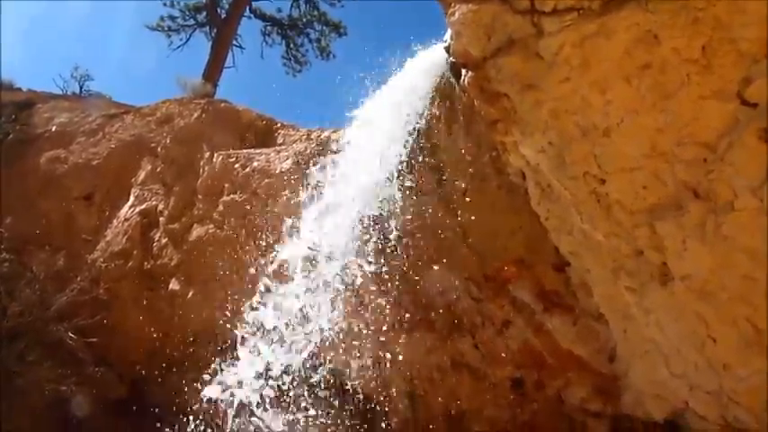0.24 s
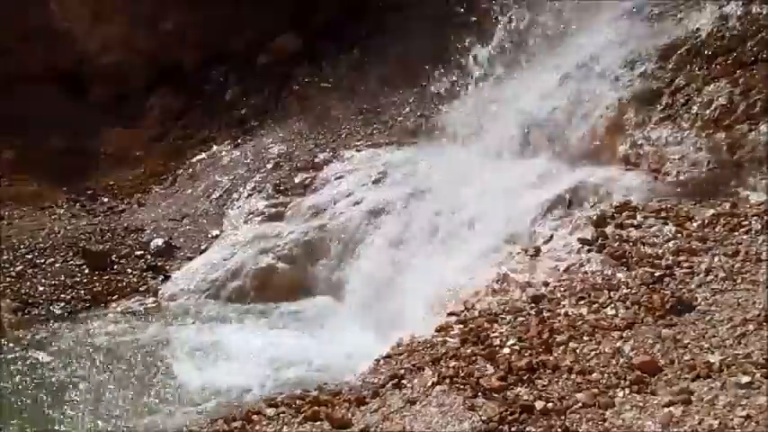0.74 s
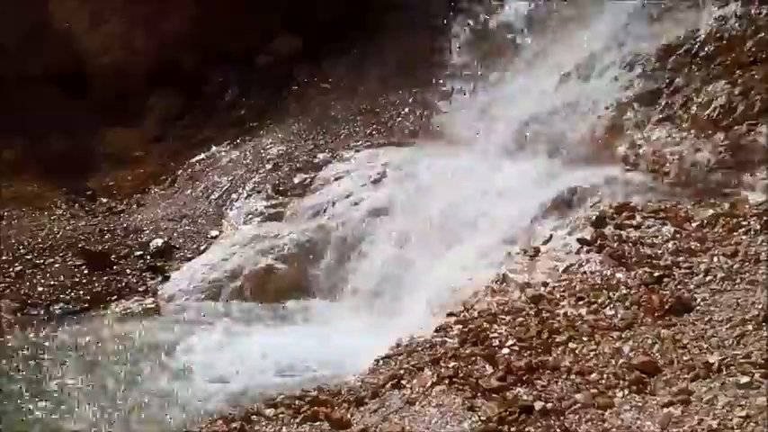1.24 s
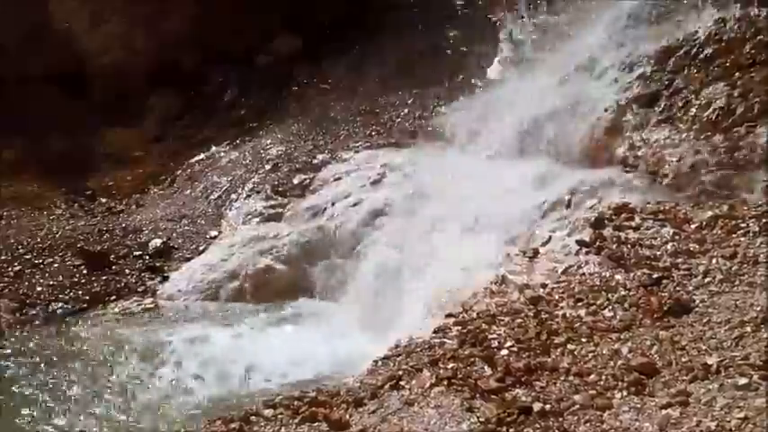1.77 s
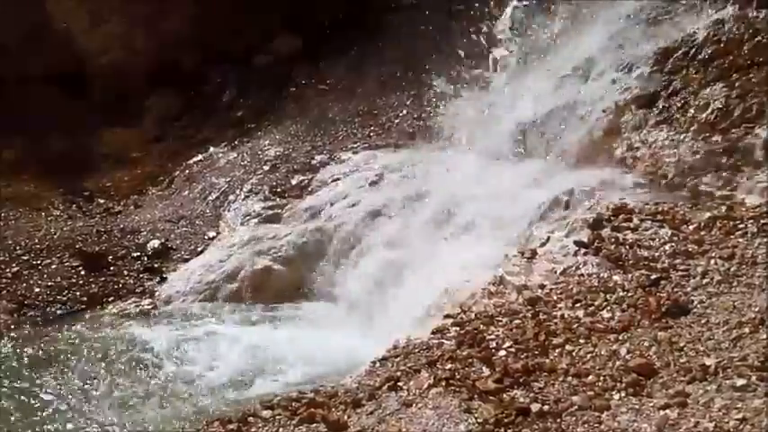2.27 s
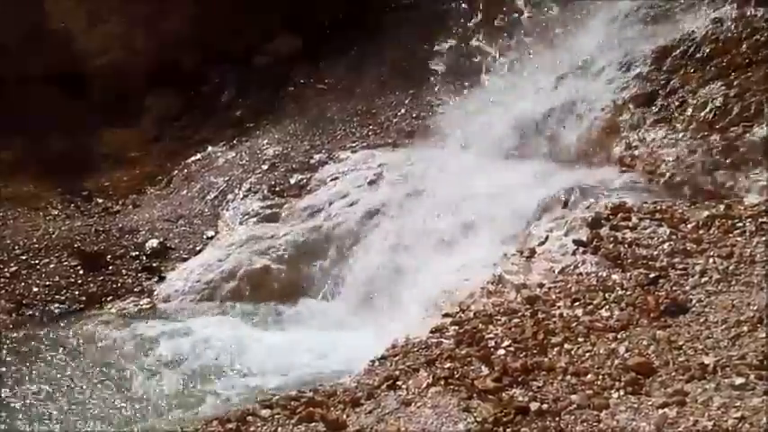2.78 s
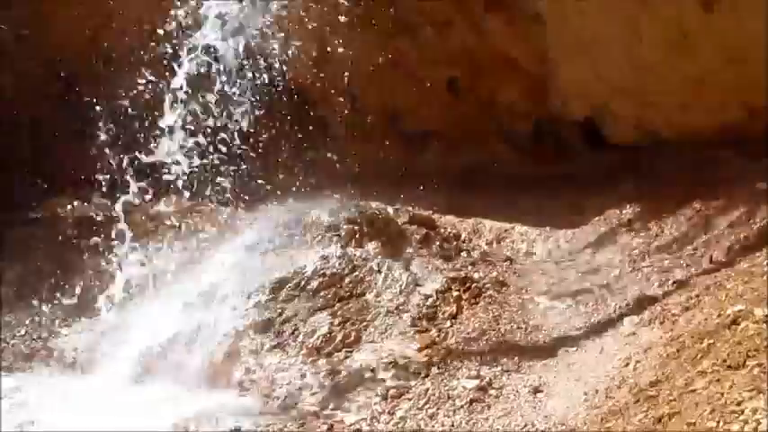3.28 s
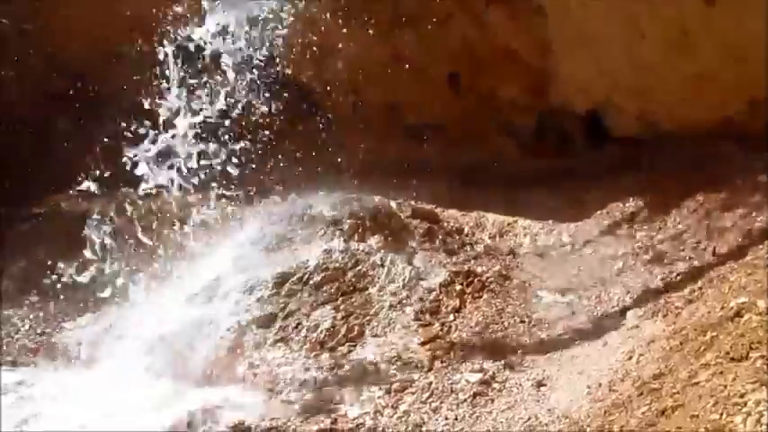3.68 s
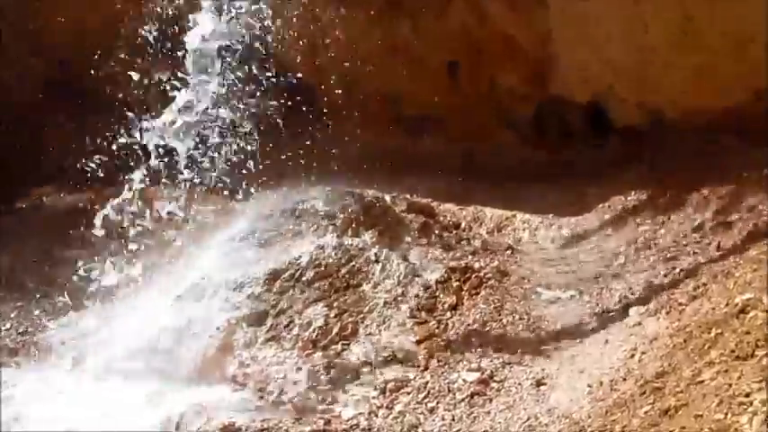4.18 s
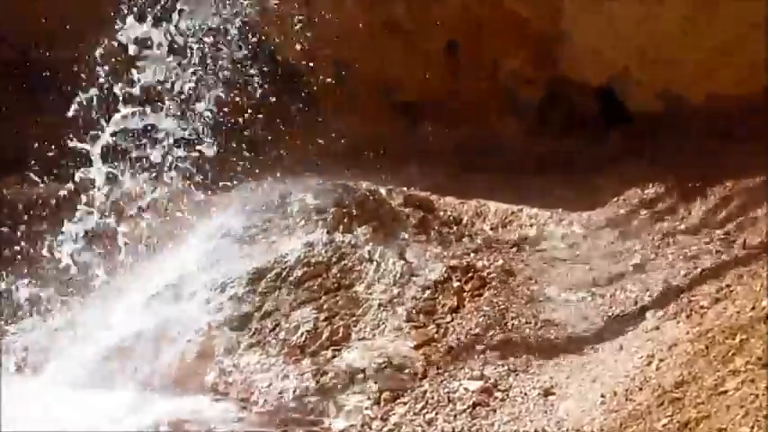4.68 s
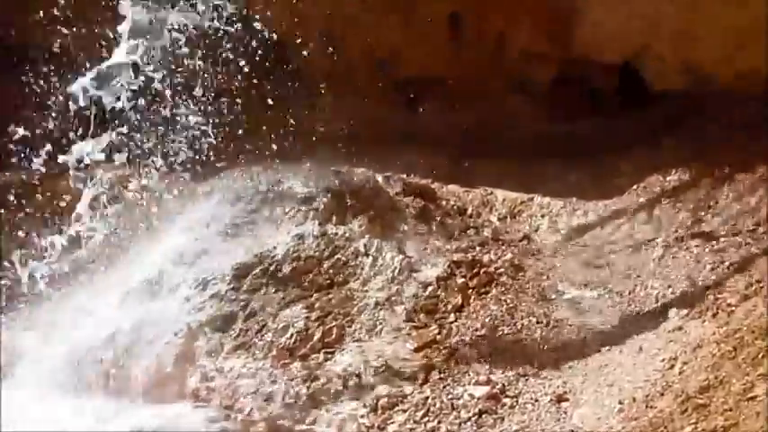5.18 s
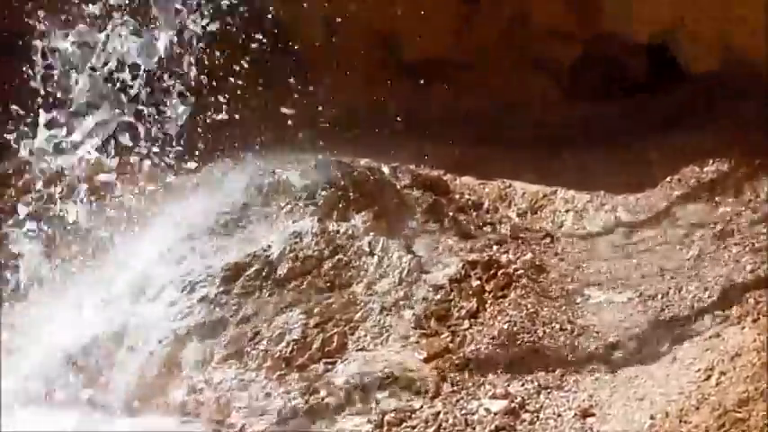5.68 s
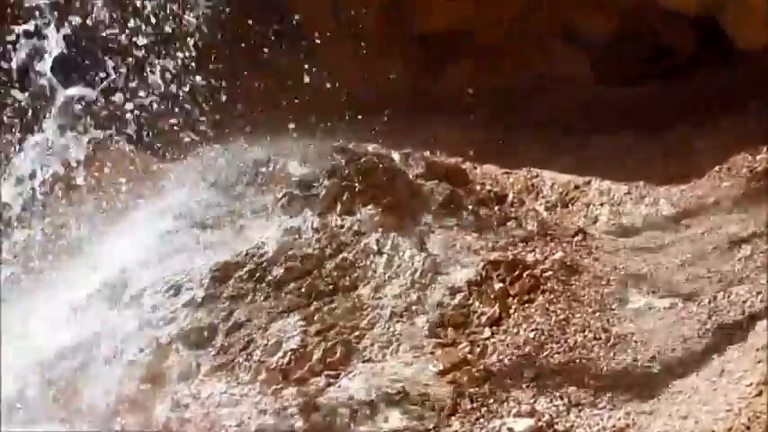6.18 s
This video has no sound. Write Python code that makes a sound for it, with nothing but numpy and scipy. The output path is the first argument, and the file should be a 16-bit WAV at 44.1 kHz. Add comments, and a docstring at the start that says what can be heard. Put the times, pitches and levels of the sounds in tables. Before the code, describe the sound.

A small waterfall is already roaring at full strength, cuts to a short silence, returns from a second spot as a bright, gushing cascade over gravel with low wind buffets mostly on the left, cuts again briefly, then continues without wind, more splattery, with wet slaps and drop ticks. Outdoors, close stereo microphone, dry, no echo.

```python
"""A waterfall roars from the first instant, dropping onto a rock mound and running off over gravel.
It is heard from three spots in turn, parted by short silences. The fall is a dense train of random impacts
plus ringing air bubbles, filtered and flickering band by band. Wind buffets the two microphone ports as
low-passed noise at the first two spots; drops tick on stone as damped clicks; lumps of water slap as
decaying sines."""
import sys
import numpy as np
from scipy import signal
from scipy.fft import rfft, irfft, next_fast_len
from scipy.io import wavfile

SR = 44100
rng = np.random.default_rng(int(sys.argv[2]) if len(sys.argv) > 2 else 0)


def transcribe(u):
    """Save the signal u as a 16-bit wav file named by the first command-line argument.

    u: samples, shape (n,) or (channels, n), limited to [-1, 1]; the rate is SR.
    q: integer samples, one column per channel.
    """
    v = np.clip(np.atleast_2d(u).T, -1, 1)
    q = np.round(v * 32767).astype(np.int16)
    wavfile.write(sys.argv[1], SR, q)


N = 283563

# Listening spots. Each row: start in seconds, end in seconds, lag of the left port in microseconds.
SPOTS = [(-.01, .4700, -42), (.6463, 3.0845, 38), (3.2497, 6.45, -38)]
# Strength of the flow, one list per spot. Each row: time in seconds, level in dB.
FLOW = [
    [(0, -20.5), (.13, -19.5), (.47, -19.5)],
    [(.65, -18), (.75, -19.5), (.94, -19), (1.04, -20.5), (1.27, -21.5), (1.5, -19.5), (2.0, -20.5),
     (2.17, -20.5), (2.8, -20.5), (2.86, -22.5), (2.93, -20.5), (3.08, -22)],
    [(3.25, -19.5), (3.5, -19.5), (3.95, -20), (4.09, -22), (4.38, -21), (4.5, -20), (4.77, -20),
     (5.39, -21), (5.58, -19.6), (5.75, -21.5), (5.9, -21), (6.43, -20.3)],
]
# Relative spectrum of the fall, microphone included, one list per spot. Each row: frequency in Hz, dB per Hz.
COLOUR = [
    [(40, -21), (184, -10.5), (303, -12), (371, -10), (710, -5), (1030, -6.5), (1500, -2.5), (2540, -1),
     (4200, -3), (6500, -6.5), (9500, -10.5), (13000, -20), (15800, -24)],
    [(40, -31), (230, -13.5), (340, -19.5), (560, -11), (800, -10.5), (1000, -8.5), (1800, -5), (2400, -4),
     (3700, -4.15), (4500, -7), (6500, -8), (9500, -11.5), (13000, -19), (15800, -27)],
    [(30, -39), (110, -21.5), (235, -12), (330, -17.5), (600, -9.5), (850, -11), (1350, -6.5), (1600, -7),
     (2300, -4), (3400, -6), (5600, -14), (7500, -9.5), (10000, -14), (15800, -25.5)],
]
# Share of power reaching both ports straight from the fall, one list per spot.
# Each row: frequency in Hz, left-right likeness from 0 to 1.
LIKENESS = [
    [(100, 0.76), (600, 0.98), (1700, 0.71), (3200, 0.77), (6500, .15), (9500, 0.41), (15000, .08)],
    [(100, 0.76), (700, 0.94), (1700, 0.7), (3700, 0.41), (6500, 0.31), (10500, 0.19), (15000, 0.21)],
    [(100, 0.99), (700, 0.9), (1700, 0.78), (3200, 0.37), (5500, 0.18), (10000, 0.31), (15000, 0.091)],
]
# Balance of the ports, one list per spot. Each row: frequency in Hz, left minus right in dB.
SIDEDNESS = [
    [(300, -0.5), (700, 1.5), (1700, -0.5), (3200, -3.5), (7000, 1.3), (8500, -0.5), (12000, .5)],
    [(300, -1), (700, -0.2), (1700, -1.1), (3700, -3.5), (6000, -1.2), (10000, -2.5), (14000, -1)],
    [(300, 0), (800, 0.7), (2500, -1.7), (3700, 0.5), (8500, -0.7), (14000, 0)],
]
# Random swell of the whole fall
SURGE_DB, SURGES_PER_S = .25, 6.0
# Share of the flow's swing in dB that the fine spray takes part in
SPRAY_FOLLOWS = 0.95
# Relative spectrum of the wind noise. Each row: frequency in Hz, dB per Hz.
GUST_COLOUR = [(15, -38.5), (25, -10), (87, 4), (204, 1), (509, -3), (647, -10.5), (900, -9), (1170, -45.5),
               (1980, -120)]
# Steady breeze on the ports. Each row: time in seconds, level in dB, left minus right in dB.
BREEZE = [(0, -51, 2), (.47, -40.5, 1), (.65, -57, 8), (1.1, -41, 6.5), (1.9, -48, 12), (2.4, -55.5, 10),
          (2.7, -54.5, 3), (3.08, -44, 0)]
# Gusts. Each row: time of the top in seconds, level in dB, length in seconds, left minus right in dB,
# brightness (upper minus lower part) in dB.
GUSTS = [(0.197, -31.5, 0.012, -2, 12), (0.425, -51.5, 0.053, -1, -4), (0.754, -32, 0.034, 21, 1.5),
         (0.854, -33.5, 0.068, 14, -2), (0.966, -45, 0.06, 14, -18), (1.381, -37, 0.068, 19, -10),
         (1.507, -37, .04, 8, -7), (1.562, -32.5, .05, 14, 4), (1.662, -35, 0.019, 16, 2.5),
         (1.855, -41.5, .05, 19, 10), (1.96, -38, 0.045, 13, 5), (2.044, -49, 0.026, 11, 1),
         (2.236, -40.5, 0.042, 16, -11), (2.32, -51, 0.12, 21, -18.5), (2.846, -37, .05, 2, -15),
         (3.006, -45.5, .08, 3, -4)]
GUST_FALL_TO_RISE = 1.18   # a gust dies this much slower than it rises
# Single drops on stone close by. Each row: time in seconds, peak in dB.
TICKS = [(0.8783, -11), (1.664, -6), (2.7845, -8), (3.5377, -9.5), (4.0075, -10), (4.1964, -8),
         (4.601, -16), (4.6426, -9), (5.220, -8)]
# Big lumps of water landing. Each row: time in seconds, peak in dB, pitch in Hz.
SLAPS = [(0.9901, -9, 2390), (1.2051, -16, 1800), (2.069, -7.5, 4090), (2.2017, -8.5, 2330),
         (2.3583, -9, 1970), (2.6089, -17, 3180), (2.905, -11, 2540), (3.0524, -10, 1960),
         (3.7497, -10.5, 1970), (3.899, -5, 2040), (4.0287, -13.5, 2050), (4.468, -8.5, 2800),
         (4.656, -9, 2500), (4.737, -6, 2500), (5.332, -6.5, 2820), (5.6254, -4.5, 2160),
         (5.8326, -7, 1740), (6.2227, -38, 1500), (6.361, -17, 1840)]
# Narrow dark lines at the first two spots. Each row: frequency in Hz, width in Hz, depth from 0 to 1.
NOTCHES = [(5915, 150, 0.8), (7840, 220, .96)]
TAIL_DROP_DB, TAIL_DB_PER_S = -16, 1509   # a faint tail dies after each stop
CUTOFF_HZ = 15820
CONTROL_STEP = 40   # samples between the points of a slow curve
HALF_EACH = np.array([[.5], [-.5]])   # splits a left-minus-right dB value between the ports


def amp(db):
    """Decibel law: 20 dB is a tenfold amplitude."""
    return 10 ** (np.asarray(db) / 20)


def rms_one(x):
    """Normalisation to unit root-mean-square amplitude."""
    return x / np.sqrt(np.mean(x ** 2) + 1e-20)


def in_time(tables):
    """Linear interpolation of joined curve tables, giving each column one value per sample."""
    seconds, *columns = np.transpose(np.concatenate(tables))
    t = np.arange(N) / SR
    return [np.interp(t, seconds, column) for column in columns]


def at_hz(points, hz):
    """Interpolation of a spectrum along a logarithmic frequency axis."""
    table_hz, values = np.array(points).T
    return np.interp(np.log(hz + 1), np.log(table_hz), values)


def drift(rate, size):
    """Low-passed noise: two equal poles at rate Hz leave a slow random curve of unit spread."""
    pole = np.exp(-2 * np.pi * rate * CONTROL_STEP / SR)
    noise = rng.standard_normal(size // CONTROL_STEP + 2002)
    slow = signal.lfilter([1], [1, -2 * pole, pole * pole], noise)[2000:]   # settled part only
    return np.interp(np.arange(size) / CONTROL_STEP, np.arange(len(slow)), rms_one(slow))


def drops(size, per_s, spread_db):
    """Shot noise: impacts fall at independent random moments, most small, a few large."""
    size_db = spread_db * np.minimum(rng.exponential(1, size), 5.0)
    impacts = amp(size_db) * rng.choice([-1, 1], size)
    lands = rng.random(size) < per_s / SR
    return rms_one(impacts * lands)


def bubbles(size, hz, per_s, cycles):
    """Bubble resonance: each trapped air pocket rings at one of many pitches, losing 60 dB in some cycles."""
    pitches_hz = np.geomspace(450, 6000, 30)
    born = drops(size, per_s, spread_db=2.0)
    dealt = rng.integers(0, len(pitches_hz), size)   # which pitch each bubble takes
    spectrum = 0
    for k, pitch_hz in enumerate(pitches_hz):
        width_hz = np.log(1000) * pitch_hz / cycles / np.pi
        resonance = 1 / (1 + 2j * (hz - pitch_hz) / width_hz)
        spectrum = spectrum + rfft(born * (dealt == k)) * resonance
    return spectrum * np.sqrt(len(pitches_hz))


def fall(spot, size, bright_db):
    """Partial coherence: both ports share straight drops and bubbles, and each adds its own scattered drops."""
    hz = np.fft.rfftfreq(size, 1 / SR)
    straight = rfft(drops(size, per_s=14000.0, spread_db=1.75))
    straight = straight + amp(-3.0) * bubbles(size, hz, per_s=1500.0, cycles=36.0)
    scattered = rfft([drops(size, per_s=14000.0, spread_db=3.0) for side in "LR"])

    alike = np.clip(at_hz(LIKENESS[spot], hz), 0, 1)
    late = np.exp(-2j * np.pi * hz * SPOTS[spot][2] / 1e6)   # delay as a phase slope
    lags = np.array([late, np.ones_like(late)])
    pair = np.sqrt(alike) * straight * lags + np.sqrt(1 - alike) * scattered
    pair = pair * amp(at_hz(COLOUR[spot], hz) + at_hz(SIDEDNESS[spot], hz) * HALF_EACH)

    band_place = np.clip(2 * np.log2((hz + 1) / 60), 0, 16)   # in half octaves above 60 Hz
    out = 0
    surge, neighbour = drift(40, size), drift(15, size)
    for band in range(17):
        share = np.clip(1 - abs(band_place - band), 0, 1)   # overlapping triangles
        own = drift(15, size)
        flicker_db = 0.35 * surge + 0.42 * (own + neighbour)   # adjoining bands flicker partly together
        spray_db = bright_db * np.clip(band - 11, 0, 2) / 2   # treble bands only
        out = out + irfft(pair * share, size) * amp(flicker_db + spray_db)
        neighbour = own
    return out / np.sqrt(np.mean(out.mean(axis=0) ** 2))


def wind():
    """Turbulent pressure: lumpy low noise, separate in each port; bright gusts hold more upper rumble."""
    t, hz = np.arange(N) / SR, np.fft.rfftfreq(N, 1 / SR)
    rumble = rfft(rng.standard_normal((2, N))) * amp(at_hz(GUST_COLOUR, hz))
    upper = 1 / (1 + (140 / (hz + 1)) ** 4)   # crossover at about 140 Hz
    scale = np.std(irfft(rumble, N))

    level_db, pan_db = in_time([BREEZE])
    low = high = amp(level_db + pan_db * HALF_EACH)
    for top_s, top_db, length, gust_pan_db, bright_db in GUSTS:
        stretch = np.where(t < top_s, 1, GUST_FALL_TO_RISE)
        swell = np.exp(-(2 * (t - top_s) / length / stretch) ** 2)
        low = low + swell * amp(top_db - bright_db / 2 + gust_pan_db * HALF_EACH)
        high = high + swell * amp(top_db + bright_db / 2 + gust_pan_db * HALF_EACH)

    lumps_db = 2.2 * np.array([drift(26.0, N), drift(30.0, N)])
    blown = low * irfft(rumble * (1 - upper), N) + high * irfft(rumble * upper, N)
    before_last_spot = t < SPOTS[2][0]
    return before_last_spot * blown / scale * amp(lumps_db)


def ticks():
    """Impulse response: a click excites the bright, quickly damped ring of wet stone."""
    clicks = np.zeros(N)
    stone = signal.butter(1, [4000, 9500], "band", fs=SR, output="sos")
    for s, peak_db in TICKS:
        clicks[round(s * SR)] = amp(peak_db)
    return signal.sosfilt(stone, clicks) / stone[0, 0]   # makes the first sample the stated peak


def slaps():
    """Damped oscillation: each lump is a blunt smack that loses 60 dB in 16 cycles."""
    out = np.zeros(N)
    t = np.arange(400) / SR
    for s, peak_db, hz in SLAPS:
        at = round(s * SR)
        cycles = hz * t
        blunt_onset = np.minimum(cycles / 1.1, 1)
        smack = np.sin(2 * np.pi * cycles) * amp(-60 * cycles / 16.0) * blunt_onset
        out[at:at + len(t)] += amp(peak_db) * smack[:N - at] / abs(smack).max()
    return out


def scene():
    """Superposition: the fall at each spot in turn, summed with wind, ticks and slaps."""
    level_db = in_time(FLOW)[0] + SURGE_DB * drift(SURGES_PER_S, N)
    edges = [0, round(SPOTS[1][0] * SR), round(SPOTS[2][0] * SR), N]
    water = np.zeros((2, N))
    for spot in range(3):
        a, b = edges[spot], edges[spot + 1]
        size = next_fast_len(b - a)
        swing_db = level_db[a:b] - level_db[a:b].mean()
        bright_db = (SPRAY_FOLLOWS - 1) * swing_db   # the spray lags behind the full swing
        water[:, a:b] = fall(spot, size, np.resize(bright_db, size))[:, :b - a]
    return amp(level_db) * water + wind() + ticks() + slaps()


def record(dry):
    """Linear filtering and gating: notches at the first two spots, silence between spots, a steep low-pass."""
    t, notched = np.arange(N) / SR, dry
    for hz, width_hz, depth in NOTCHES:
        line = signal.lfilter(*signal.iirpeak(hz, hz / width_hz, SR), notched)
        notched = notched - min(depth, 1) * line
    sound = np.where(t < SPOTS[2][0], notched, dry)

    gate = np.zeros(N)
    for start, end, late_us in SPOTS:
        tail_db = np.maximum(TAIL_DROP_DB - TAIL_DB_PER_S * (t - end), -200)
        tail = amp(tail_db) * (t < end + .04)
        gate += (t >= start) * np.where(t < end, 1, tail)
    top_cut = signal.ellip(12, .3, 75, CUTOFF_HZ, fs=SR, output="sos")
    return signal.sosfilt(top_cut, sound * gate)


dry = scene()
out = record(dry)
transcribe(out)
```